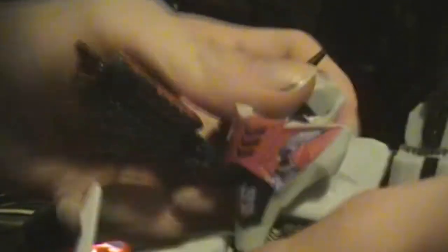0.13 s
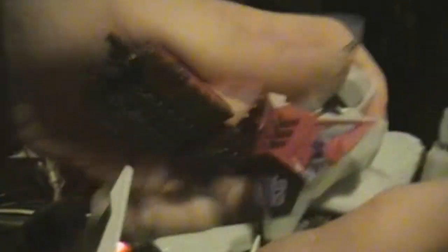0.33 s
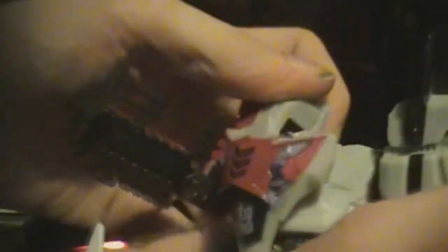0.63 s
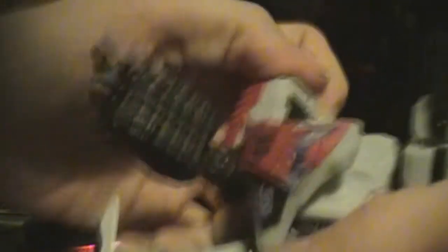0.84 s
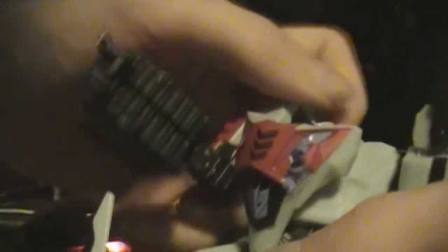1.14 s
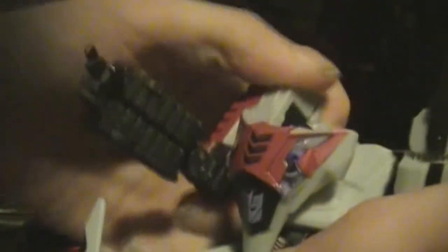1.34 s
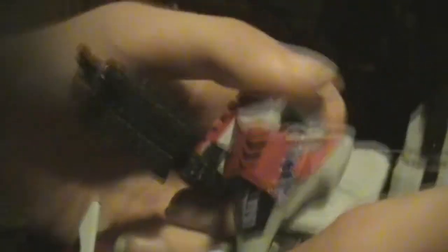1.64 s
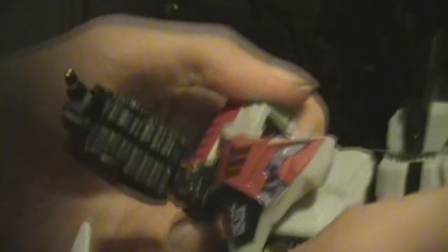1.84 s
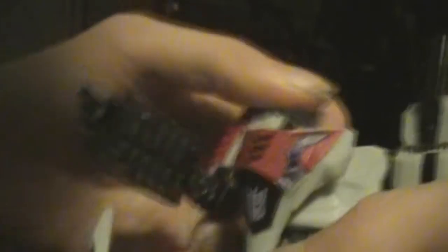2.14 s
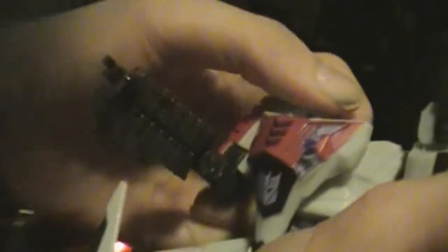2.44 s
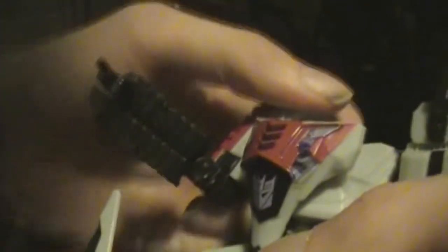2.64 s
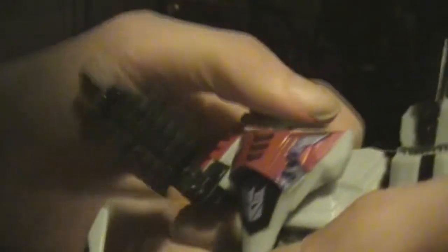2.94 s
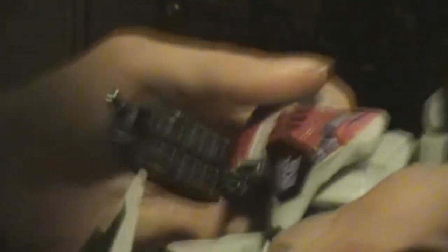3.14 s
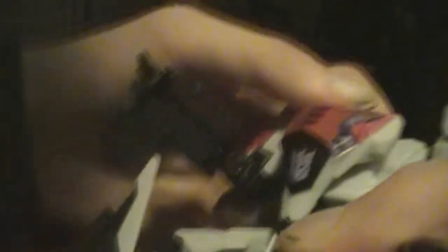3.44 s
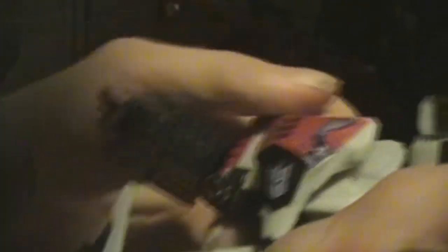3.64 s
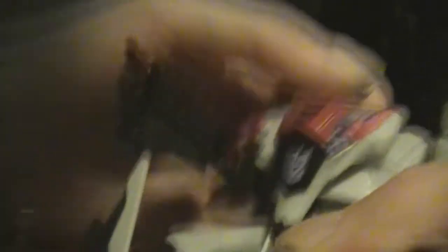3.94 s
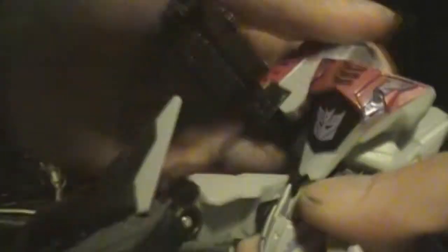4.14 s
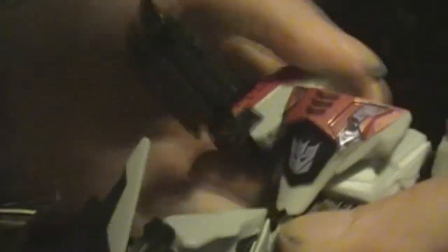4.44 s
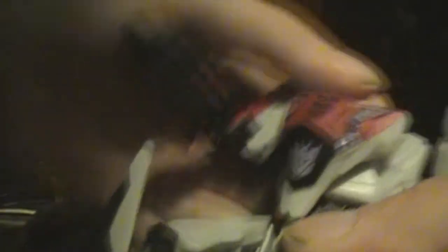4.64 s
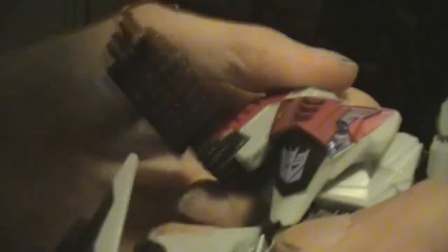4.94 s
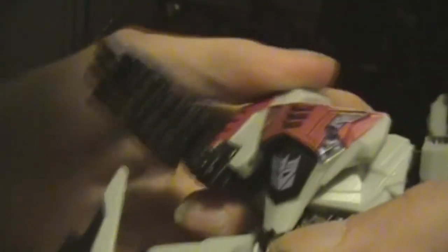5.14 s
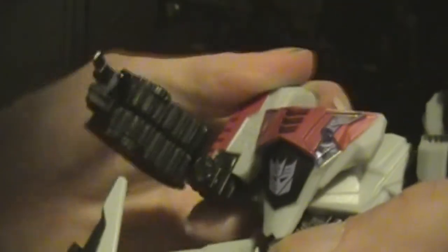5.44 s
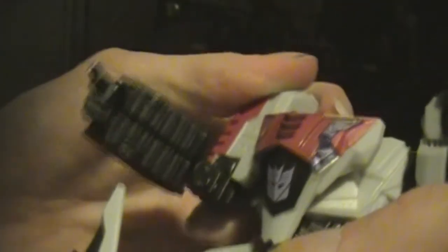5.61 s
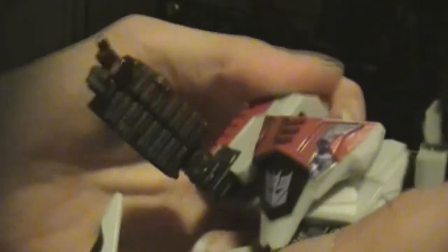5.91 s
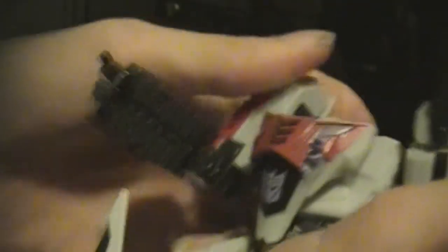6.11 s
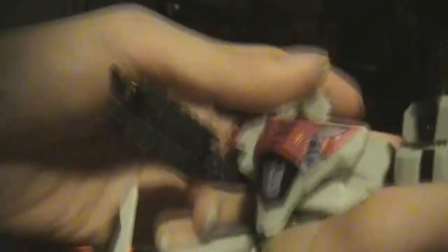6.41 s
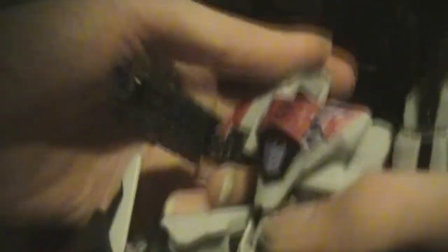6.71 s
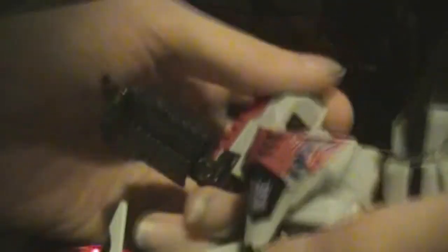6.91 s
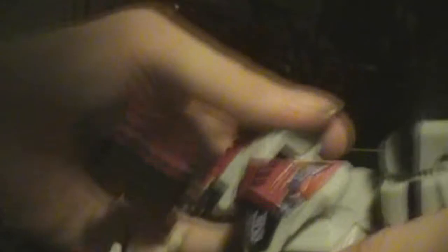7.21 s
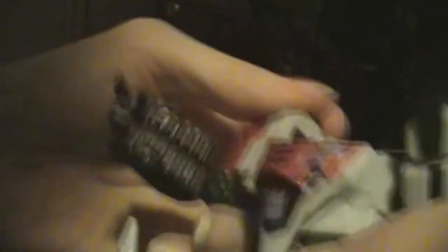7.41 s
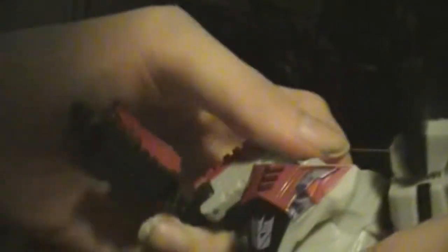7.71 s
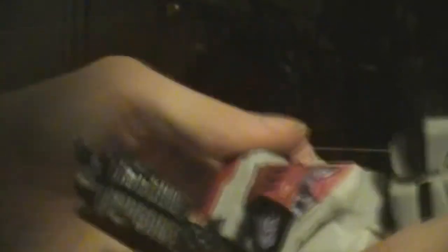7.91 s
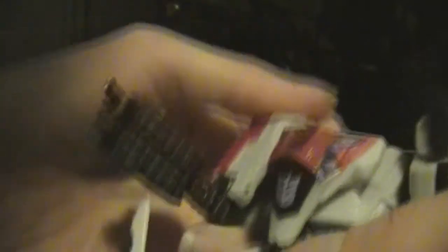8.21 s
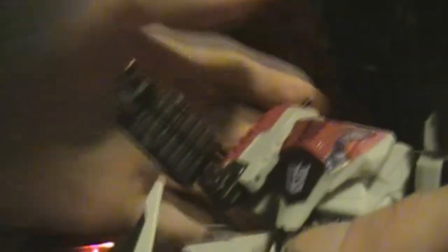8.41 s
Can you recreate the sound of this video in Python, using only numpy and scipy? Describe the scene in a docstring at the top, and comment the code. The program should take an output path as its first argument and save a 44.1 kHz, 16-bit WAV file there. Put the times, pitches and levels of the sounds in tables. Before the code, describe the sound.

A plastic toy figure is handled right at the microphone in a small room with steady soft noise and hiss. At 0.1 s a faint panel knock, then light rubbing and ticks until 0.6. From 0.7 joints click and scrape, and at about 0.98 comes the heaviest clack, with a low thump; the hiss drops and swells back. Bright snaps follow at 1.4, 1.7, 1.9, 2.2 and a double at 2.35, with tiny rattles. After a gap, snaps at 3.07 and 3.24, small ticks near 3.5, knocks around 4.2, then snaps at 4.4, 4.9 and 5.3. A crisp tick lands at 5.8. From 6.1 to 7.0 a stiff joint grinds in uneven, gritty pulses, strongest at the start. Snaps cluster at 7.0-7.3 over faint sliding, with a hard one at 7.8. A small tick and very quiet scraping end it near 8.5.

```python
"""A small room: hands fold and twist a plastic toy figure, right in front of a camera's microphone.
Joints snap over their detents, loose parts tick, panels knock and scrape, a stiff joint grinds.
Each contact is noise plus the decaying modes of one hollow plastic body, levelled in three registers.
Weak reflections and steady room noise with microphone hiss lie around them.
The camera's limiter ducks on the hardest snaps, and the room noise swells back after each."""
import sys
import numpy as np
from scipy import signal
from scipy.fft import rfft, irfft
from scipy.io import wavfile
from scipy.ndimage import uniform_filter1d

SR = 44100
rng = np.random.default_rng(int(sys.argv[2]) if len(sys.argv) > 2 else 0)


def put_to_file(sound):
    """Save the sound as 16-bit audio at rate SR, in the file named by the first command-line argument."""
    columns = np.atleast_2d(sound).T  # one column per channel
    safe = np.clip(columns, -1, 1)
    whole_steps = np.round(safe * 32767)
    wavfile.write(sys.argv[1], SR, whole_steps.astype(np.int16))


N = 377451


def undb(db):
    """Amplitude factor of a level in dB."""
    return 10 ** (np.asarray(db) / 20)


def add(track, start, sound):
    """Mix a sound into a track from a time in seconds on."""
    i = max(int(start * SR), 0)
    track[i:i + len(sound)] += sound[:max(len(track) - i, 0)]


def fade(t, t60):
    """Exponential decay, 60 dB in t60 seconds."""
    return np.exp(-np.log(1000) * t / t60)


def unit(x):
    """Scale to unit energy."""
    return x / np.sqrt(np.sum(x ** 2))


def walk(rate, count):
    """Slow chance: Gaussian levels, drawn at a rate in Hz and joined by lines."""
    steps = np.arange(count) * rate / SR
    last = int(steps[-1]) + 2
    return np.interp(steps, np.arange(last), rng.standard_normal(last))


def colour(x, points, size=2048):
    """Causal minimum-phase filter through (f/Hz, level/dB) points, from the cepstrum of its gain."""
    hz, db = np.transpose(points)
    grid = np.maximum(np.fft.rfftfreq(size, 1 / SR), 1)
    gain = undb(np.interp(np.log(grid), np.log(hz), db))
    cepstrum = irfft(np.log(gain))
    # folding the cepstrum forward in time makes the filter causal
    cepstrum[1:size // 2] *= 2
    cepstrum[size // 2 + 1:] = 0
    impulse = irfft(np.exp(rfft(cepstrum)))
    return signal.fftconvolve(x, impulse)[:len(x)]


# Joints snapping home, levels ahead of the joint colour:
# t/s, shell level/dB, panel level/dB, edge level/dB
JOINT_SNAPS = [(0.7025, -49, -27, -21.5), (0.9808, -23, -7, -14.5), (1.4222, -28, -14.5, -3),
               (1.6732, -37.5, -17.5, -15), (1.8758, -37.5, -21, -24.5), (2.1645, -35, -15, -12),
               (2.3535, -40, -22, -21), (2.3577, -28.5, -22.5, -5), (3.068, -33, -14.5, -6),
               (3.2393, -39.5, -20.5, -13), (4.4224, -34, -19, -9), (4.9321, -35, -22.5, -28.5),
               (5.2802, -33, -15.5, -14), (7.0342, -43.5, -22, -23), (7.165, -39, -25, -20.5),
               (7.3102, -35, -16, -14), (7.7915, -33.5, -9.5, -5.5)]
# Colour that every snapping joint shares: f/Hz, level/dB
JOINT_COLOUR = [(500, -0.5), (800, 1.5), (1100, -3), (1700, -2), (2400, -6), (3200, 2.5), (4300, 1.5),
                (5500, -1.5), (12000, -0.5), (13500, -10)]


def snaps(chatter_db=-38, chatter_spread_db=3, chatter_s=.07, chatter_tilt_db=-13):
    """A detent lets go all at once: a hard, short contact whose jolt sets light loose parts chattering."""
    out = np.zeros(N)
    for start, *levels in JOINT_SNAPS:
        snap = blow(levels, ring=0.83, crack_t60=0.0077, crack_db=-1,
                    buzz_t60=0.042, buzz_db=-18.5, spread_db=1.0)
        add(out, start, snap)
        delays = rng.uniform(0.073, 1, size=4)  # as shares of chatter_s
        sizes = rng.standard_normal(size=4)
        for delay, size in zip(delays, sizes):
            # later chatter is weaker
            edge_db = max(levels) + chatter_db + chatter_spread_db * size - 10 * delay
            light = tilted(edge_db, chatter_tilt_db)  # small parts hardly move the shell
            chatter = blow(light, ring=1.1, crack_t60=.01, crack_db=2.5,
                           buzz_t60=.02, buzz_db=-15.5, spread_db=3)
            add(out, start + delay * chatter_s, chatter)
    return colour(out, JOINT_COLOUR)


# The clearest ticks: loose parts, and a few snapped joints falling back against their stops, as at 0.72, 7.04
# and 7.18 s: t/s, edge level/dB, tilt level/dB per register down from the edges
CLEAR_TICKS = [(0.3053, -40, -7.5), (0.344, -40.5, -12.5), (0.3683, -37.5, -15.5), (0.5012, -45, -6),
               (0.6813, -47.5, -13), (0.7205, -26.5, -5.5), (0.7262, -28, -9), (0.734, -23.5, -24),
               (0.794, -41, -17), (0.9508, -47, 5.5), (0.961, -22, -13), (1.032, -37.5, -12),
               (1.7122, -36, -11.5), (1.911, -36.5, -15.5), (2.0314, -34.5, -6), (2.045, -34, -8.5),
               (3.4544, -30, -10), (3.5315, -43, -3.5), (3.5447, -28.5, -16.5), (3.8048, -46, -15),
               (3.9525, -37, -2.5), (5.091, -43.5, -4), (5.1215, -45, -3), (5.146, -47, -1.5),
               (5.399, -45, -5.5), (5.795, -22.5, -22.5), (5.83, -34, -28), (6.0684, -37.5, -13.5),
               (6.09, -34, -21), (6.374, -43, -7), (6.8976, -38.5, -27), (6.924, -41, -11),
               (7.044, -28, -26), (7.182, -32, -24), (7.3565, -38.5, -16), (7.6385, -28, -16),
               (7.869, -36.5, -19.5), (8.2652, -33.5, -27)]


def ticks(strays_per_s=2, stray_db=-51, stray_spread_db=1.5):
    """Loose parts tick, a snapped joint falls back once against its stop, parts shift faintly in the hands."""
    out = np.zeros(N)
    for start, edge_db, tilt_db in CLEAR_TICKS:
        add(out, start, tick(edge_db, tilt_db))
    for start, *_ in JOINT_SNAPS:
        rebound_s = rng.uniform(0.0074, .019)
        add(out, start + rebound_s, tick(edge_db=-33, tilt_db=-17))
    for start in rng.uniform(0, N / SR, size=int(strays_per_s * N / SR)):
        edge_db = stray_db + stray_spread_db * rng.standard_normal()
        add(out, start, tick(edge_db, tilt_db=-15.5))
    return out


def tick(edge_db, tilt_db):
    """A light part falls against its stop, favouring a few of the modes."""
    levels = tilted(edge_db, tilt_db, panel_db=2)
    return blow(levels, ring=1.2, crack_t60=0.012, crack_db=-3,
                buzz_t60=0.099, buzz_db=-10, spread_db=4.5)


# Dull knocks: free panels bumping and ringing on, and at 0.98 s the hands' thump under the snap: t/s, shell
# level/dB, panel level/dB, edge level/dB, lower tone f/Hz, upper tone f/Hz
DULL_KNOCKS = [(0.0974, -43.5, -40.5, -43, 660, 1290), (0.98, -26.5, -21, -50, 172.6, 304),
               (2.203, -61.5, -53, -68, 648, 1326), (2.3277, -34.5, -40.5, -59, 366, 1253),
               (3.187, -34.5, -29, -43, 1167, 2300), (3.434, -52, -56.5, -66, 1150, 2290),
               (3.497, -50, -51, -66, 1148, 2280), (4.1712, -35, -33, -38, 910, 2990),
               (4.282, -38, -40, -43.5, 596, 2930), (5.458, -56.5, -50.5, -49, 2680, 2980),
               (5.623, -53, -53.5, -58, 696, 1370), (6.0519, -37.5, -40.5, -42, 714, 935),
               (6.656, -55, -55, -60, 147, 639)]


def knocks():
    """Dull knocks ring longer, each with two tones of its own: panels that no finger damps, and once the hands'
    thump."""
    out = np.zeros(N)
    for start, shell, panel, edge, *tones in DULL_KNOCKS:
        knock = blow((shell, panel, edge), ring=2.2, crack_t60=.016, crack_db=0,
                     buzz_t60=.06, buzz_db=-7, spread_db=4, tones=tones, tone_db=-4)
        add(out, start, knock)
    return out


# Plastic sliding on plastic or skin, levels at full pressure:
# start t/s, end t/s, edge level/dB, tilt level/dB per register down from the edges
SCRAPE_STROKES = [(0.163, 0.228, -56, 1.5), (0.281, 0.381, -52.5, -9.5), (0.403, 0.566, -59, -4.5),
                  (0.712, 0.756, -34, -13), (0.869, 0.955, -52.5, -4.5), (0.958, 0.981, -23.5, -10.5),
                  (1.678, 1.717, -45.5, -9.5), (1.98, 2.058, -54.5, 3.5), (2.055, 2.149, -62, 0),
                  (2.298, 2.342, -52, 3), (2.364, 2.385, -44.5, -8), (3.429, 3.597, -75, 4),
                  (4.172, 4.204, -56, 5), (4.278, 4.325, -65.5, 7), (4.435, 4.495, -42, -10),
                  (5.107, 5.211, -57.5, -7), (5.72, 5.834, -54.5, -4), (5.782, 5.814, -34.5, -10.5),
                  (6.46, 6.531, -58, -0.5), (6.85, 6.902, -58, 0), (7.042, 7.599, -60, -3),
                  (7.627, 7.676, -41, -13), (7.742, 7.787, -53.5, -10.5), (8.097, 8.28, -55.5, -4),
                  (8.33, 8.555, -66.5, -8.5)]


def scrapes(ease_s=.004):
    """Short strokes: the pressure sets in, holds and lets go."""
    out = np.zeros(N)
    for start, end, edge_db, tilt_db in SCRAPE_STROKES:
        age = np.arange(int((end - start) * SR)) / SR
        # long strokes set in and let go more gently than short ones
        ramp_s = min(ease_s + 0.039 * age[-1], age[-1] / 5)
        pressure = np.minimum(1, np.minimum(age, age[::-1]) / ramp_s)
        add(out, start, friction(pressure, edge_db, tilt_db, panel_db=-2.5))
    return out


# Hand pressure through one long turn of a stiff joint: t/s, level/dB ahead of the friction level
TWIST_PRESSURE = [(6.11, -54), (6.2, -50), (6.216, -26), (6.292, -61), (6.334, -42.5), (6.58, -63.5),
                  (6.648, -49), (6.742, -65.5), (6.756, -41.5), (6.822, -61), (6.892, -46.5), (7.02, -71.5)]
# Colour of that joint, with a gritty ring near 5 kHz: f/Hz, level/dB
GRIT_COLOUR = [(400, -3), (1200, 3), (3000, 0), (4800, 8), (7000, 0.5), (11000, -1.5), (14500, 6)]


def twist():
    """A stiff joint grinds round: friction for nearly a second, as loud as the hand presses."""
    out = np.zeros(N)
    when, db = np.transpose(TWIST_PRESSURE)
    pressure = undb(np.interp(np.arange(when[0], when[-1], 1 / SR), when, db))
    add(out, when[0], friction(pressure, edge_db=-1.5, tilt_db=-7, panel_db=0))
    return colour(out, GRIT_COLOUR)


def friction(pressure, edge_db, tilt_db, panel_db):
    """Stick and slip: tiny uneven slips ring the body over a rubbing hiss; the grip wavers, ridges catch."""
    slips_per_s, slip_spread_db, rub_db = 900, 4.5, -1.5
    grip_db, grip_hz = 2, 140
    catches_per_s, catch_db, catch_spread_db = 20, 5.5, 3  # catch level is above the slide's
    count = len(pressure)
    signs = rng.choice([-1, 1], count)
    sizes = signs * undb(slip_spread_db * np.minimum(rng.exponential(size=count), 4))
    slips = (rng.random(count) < slips_per_s / SR) * sizes
    slips[0] += 1  # the first slip starts the slide
    rub = unit(colour(rng.standard_normal(count), CONTACT_COLOUR))
    grip = undb(grip_db * walk(grip_hz, count))
    sound = (slide(slips) + undb(rub_db) * rub) * grip
    sound = voice(sound, tilted(edge_db, tilt_db, panel_db), count / SR)
    for when in rng.uniform(0, count / SR, size=int(catches_per_s * count / SR)):
        ridge_db = edge_db + catch_db + catch_spread_db * rng.standard_normal()
        add(sound, when, tick(ridge_db, tilt_db))
    return sound * pressure


def slide(slips):
    """The contact point travels, so every stretch of a slide rings another mix of modes."""
    stretch = int(.035 * SR)
    t = np.arange(stretch) / SR
    out = np.zeros(len(slips) + stretch)
    for i in range(0, len(slips), stretch):
        modes = body(t, ring=2.2, spread_db=4, detune=.035)
        part = signal.fftconvolve(slips[i:i + stretch], modes)
        out[i:i + len(part)] += part
    return unit(out[:len(slips)])


# Colour of contact noise: f/Hz, level/dB
CONTACT_COLOUR = [(100, -15), (300, -12), (650, -6), (1100, -6.5), (1800, -1.5), (2600, -3.5), (3200, -1),
                  (4400, -4), (6300, -5), (8000, 2), (12100, -1), (13200, -6), (15000, -10.5)]


def blow(levels, ring, crack_t60, crack_db, buzz_t60, buzz_db, spread_db,
         tones=(), tone_db=0, tone_t60=0.038):
    """One contact: a crack, the ringing body, a buzz of loose neighbours, perhaps a free panel's tones."""
    t = np.arange(int(.09 * SR)) / SR
    crack, buzz = rng.standard_normal((2, len(t)))
    crack = unit(colour(crack * fade(t, crack_t60), CONTACT_COLOUR))
    flutter = undb(2.1 * walk(500, len(t)))
    buzz = unit(colour(buzz * fade(t, buzz_t60) * flutter, CONTACT_COLOUR))
    # crack, buzz and tones are levelled against the body
    sound = body(t, ring, spread_db) + undb(crack_db) * crack + undb(buzz_db) * buzz
    for hz in tones:
        tone = unit(np.sin(2 * np.pi * hz * t) * fade(t, tone_t60))
        sound = sound + undb(tone_db) * tone
    onset = np.minimum(t / .0003, 1)
    return voice(sound * onset, levels, .0046)


# Modes of the figure, before each contact's own shifts and ring factor:
# f/Hz, level/dB, decay by 60 dB t/s
BODY_MODES = [(310, -21.5, 0.0037), (646, -18.5, 0.05), (914, -12.5, 0.025), (1370, -10.5, 0.0095),
              (1868, -2, 0.014), (2310, -6, 0.026), (3185, 3, 0.0058), (3340, -3.5, 0.007),
              (4150, -5, 0.0025), (4226, -2.5, 0.012), (4820, -7, 0.017), (5730, -5, 0.019),
              (5980, -6.5, 0.0086), (7367, 3, 0.012), (8176, 5, 0.01), (9216, 7, 0.016),
              (10040, 4.5, 0.0099), (10820, 9, .01), (12000, 4, 0.02), (14700, -17, .008)]


def body(t, ring, spread_db, detune=0.026):
    """Decaying modes of the figure; grip, pose and place of contact change them every time."""
    hz, db, t60 = np.transpose(BODY_MODES)[:, :, None]
    shift, size, side = rng.standard_normal((3, len(BODY_MODES), 1))
    strength = np.sign(side) * undb(db + spread_db * size)
    modes = strength * np.sin(2 * np.pi * hz * (1 + detune * shift) * t)
    return unit(np.sum(modes * fade(t, t60 * ring), axis=0))


def tilted(edge_db, tilt_db, panel_db=0):
    """Shell, panel and edge levels: soft, heavy contacts move the shell, hard, light ones only the edges."""
    return edge_db + tilt_db * np.array([2, 1, 0]) + panel_db * np.array([0, 1, 0])


# The whole shell bends lowest, flat panels higher, thin edges highest: lower f/Hz, upper f/Hz
BODY_REGISTERS = [(90, 1300), (1300, 6500), (6500, 15000)]


def voice(x, levels, seconds):
    """The place of contact sets how hard shell, panels and edges move: rms over the first seconds."""
    out, count = 0, int(seconds * SR)
    for band, db in zip(BODY_REGISTERS, levels):
        part = signal.sosfilt(signal.butter(3, band, "band", fs=SR, output="sos"), x)
        out = out + undb(db) * part / np.sqrt(np.mean(part[:count] ** 2))
    return out


def room(x, t60=0.11, wet_db=-25, delay_s=0.0072):
    """Weak, quickly fading reflections from the table and walls: decaying noise as impulse response."""
    t = np.arange(int(.3 * SR)) / SR
    noise = rng.standard_normal(len(t)) * fade(t, t60) * (t > delay_s)
    tail = colour(noise, [(200, -2.5), (3000, 1.5), (9000, 3.0), (15000, -4.5)])
    return x + undb(wet_db) * signal.fftconvolve(x, unit(tail))[:N]


# Colour of the room noise and hiss: f/Hz, level/dB
AIR_COLOUR = [(15, -31), (25, -7.5), (69, -16), (121, -3.5), (213, -6), (278, 0.5), (373, -6.5),
              (573, -2.5), (927, -6.5), (1150, -6.5), (1810, -8.5), (7890, -17), (9520, -13.5),
              (13500, -16.5), (15000, -36)]


def background(level_db=-61.5, waver_db=1.0):
    """Steady room noise and microphone hiss: coloured noise whose level wavers slightly."""
    air = unit(colour(rng.standard_normal(N), AIR_COLOUR)) * np.sqrt(N)  # rms of 1
    return air * undb(level_db + waver_db * walk(8.2, N))


def scene():
    """The figure close to the microphone, its reflections, and the room noise."""
    figure = snaps() + ticks() + knocks() + scrapes() + twist()
    return (room(figure) + background())[None]


def limiter(x, ceiling_db=-19.5, release_db_per_s=22):
    """The gain drops at once by the excess over the ceiling and creeps back up."""
    power = uniform_filter1d(x ** 2, int(.005 * SR))
    excess = np.maximum(10 * np.log10(np.maximum(power, 1e-12)) - ceiling_db, 0)
    recovery = release_db_per_s * np.arange(N) / SR
    return x * undb(recovery - np.maximum.accumulate(excess + recovery, axis=-1))


def record(dry, headroom=3.7, bias=0.035, top_hz=15300):
    """The preamplifier squashes peaks lopsidedly, adding a thump; the limiter ducks; the top is cut."""
    squashed = headroom * (np.tanh(dry / headroom + bias) - np.tanh(bias))
    top_cut = signal.ellip(8, .2, 70, top_hz, fs=SR, output="sos")
    return signal.sosfilt(top_cut, limiter(squashed))


dry = scene()
out = record(dry)
put_to_file(out)
```